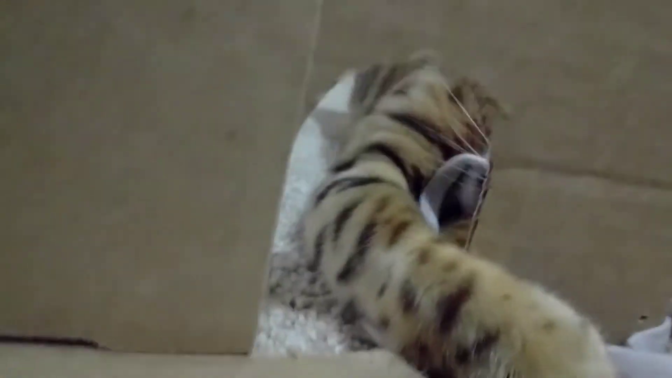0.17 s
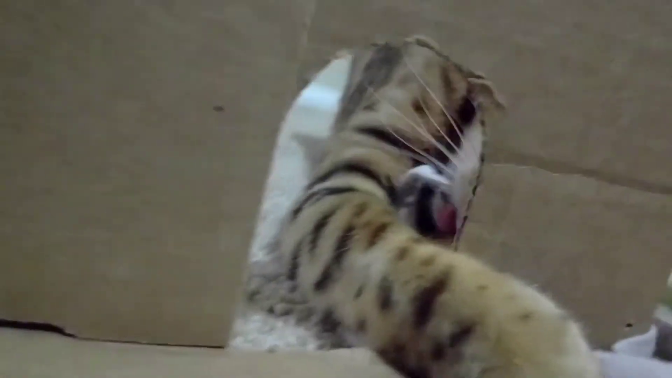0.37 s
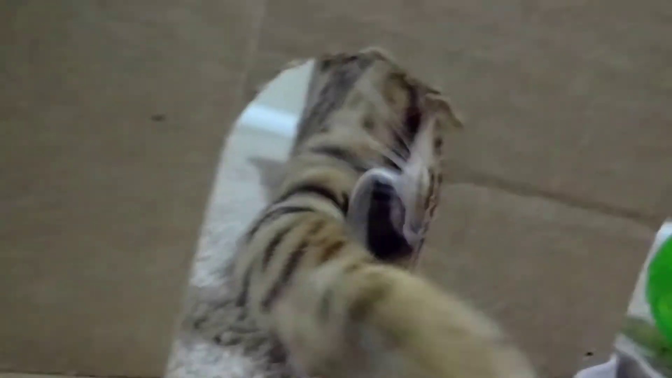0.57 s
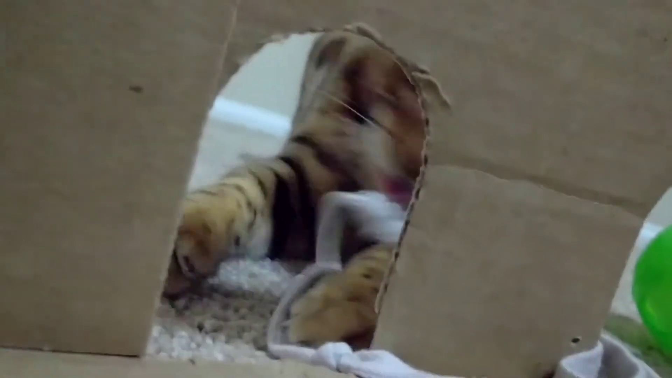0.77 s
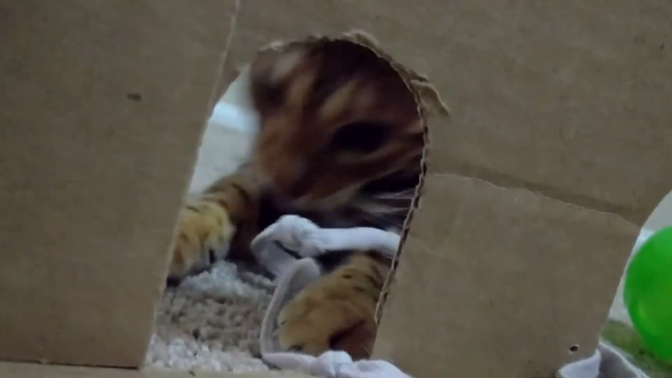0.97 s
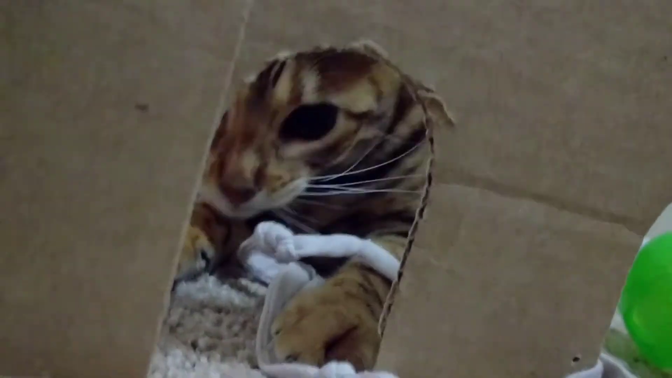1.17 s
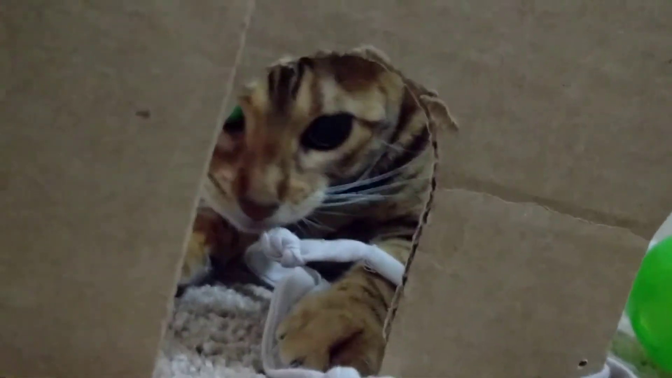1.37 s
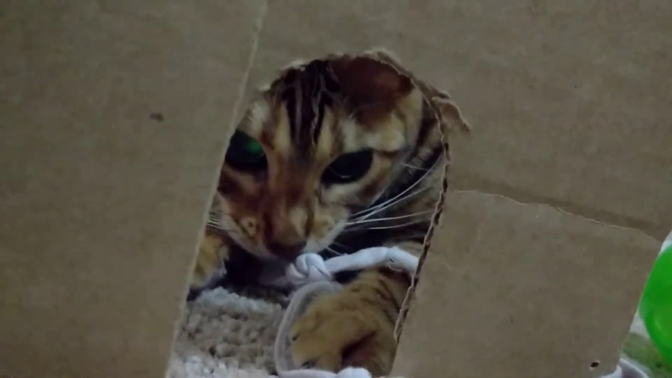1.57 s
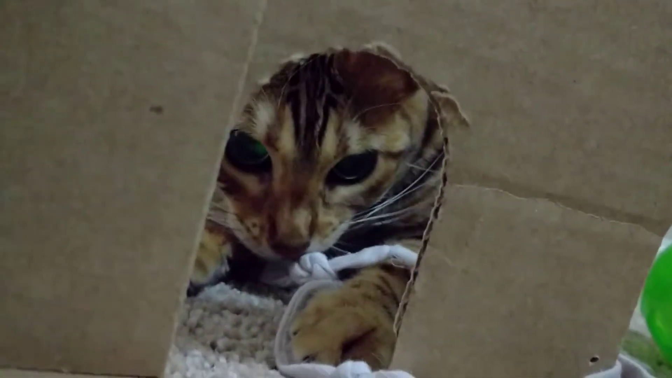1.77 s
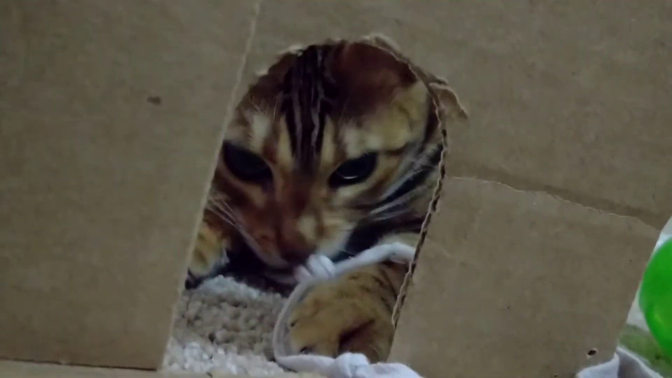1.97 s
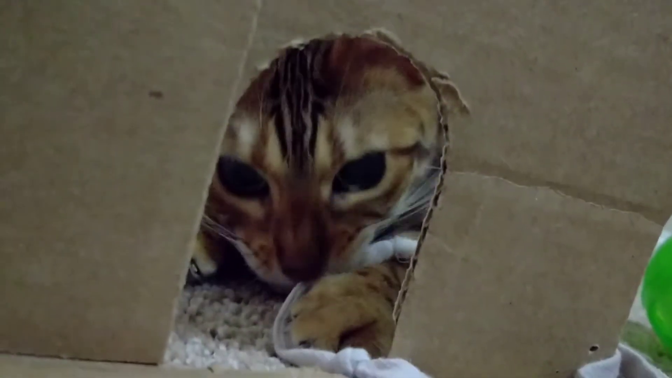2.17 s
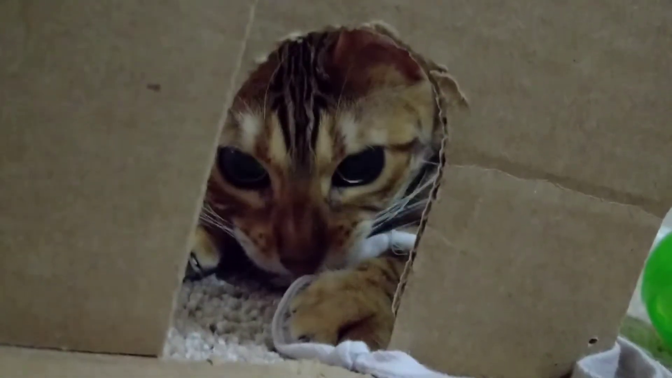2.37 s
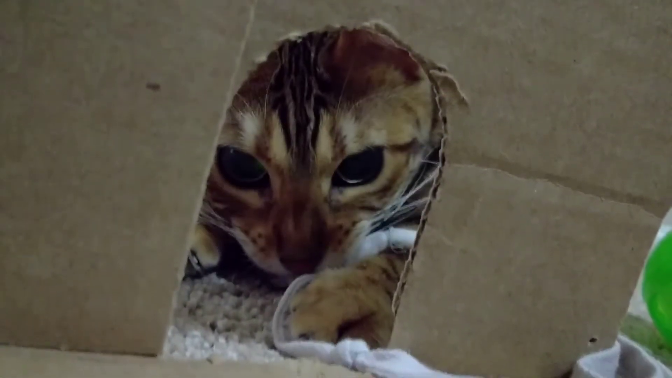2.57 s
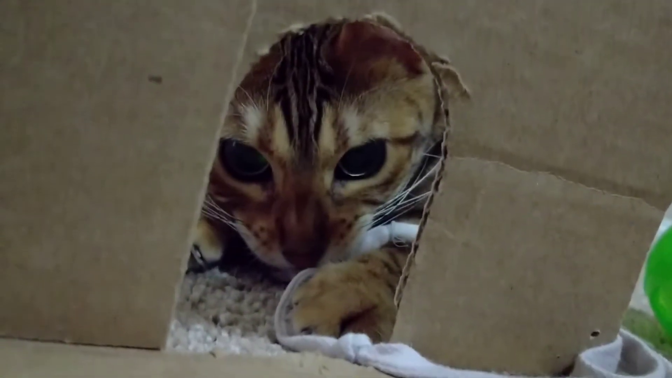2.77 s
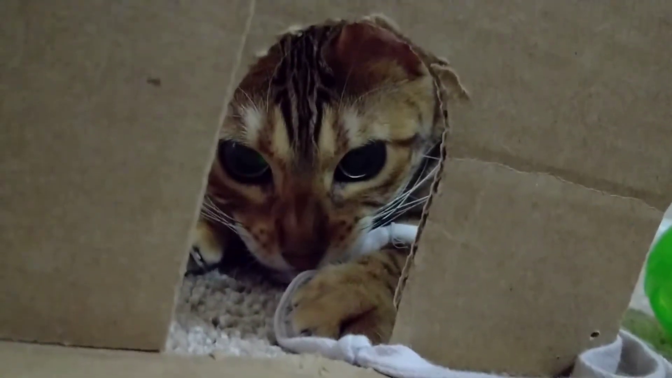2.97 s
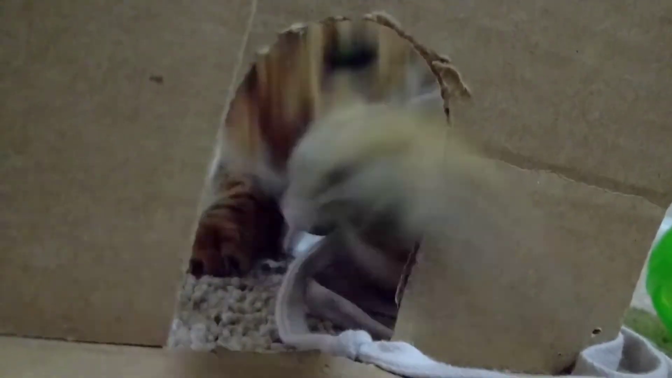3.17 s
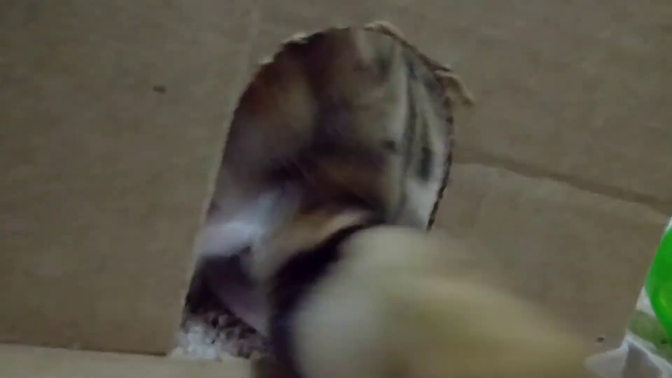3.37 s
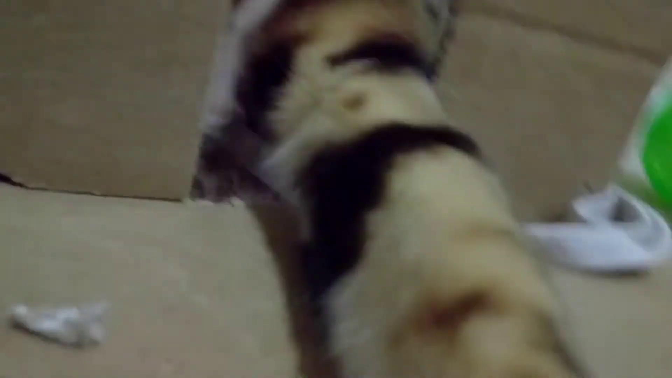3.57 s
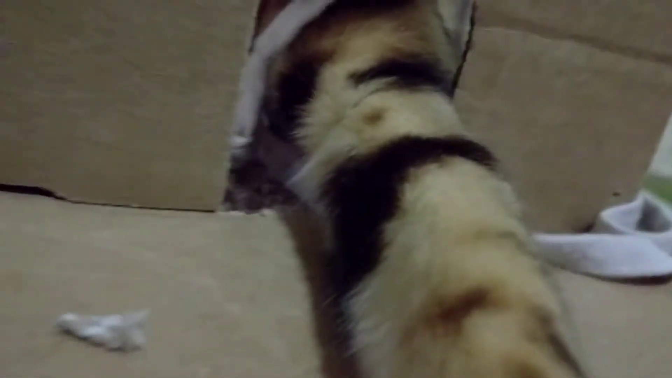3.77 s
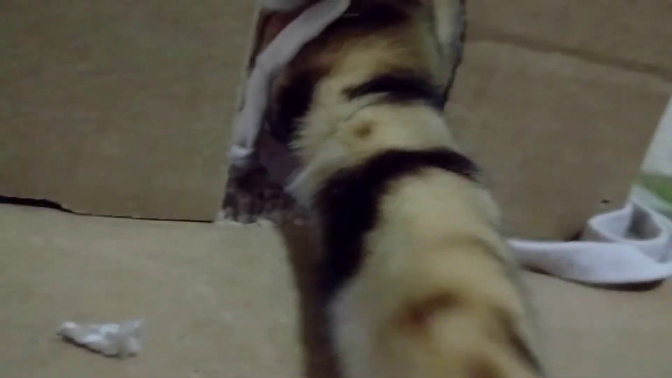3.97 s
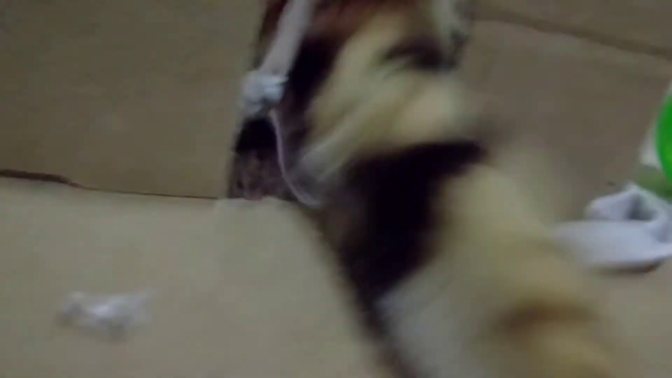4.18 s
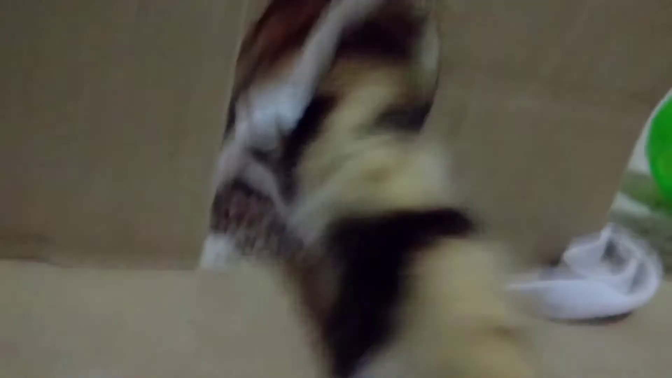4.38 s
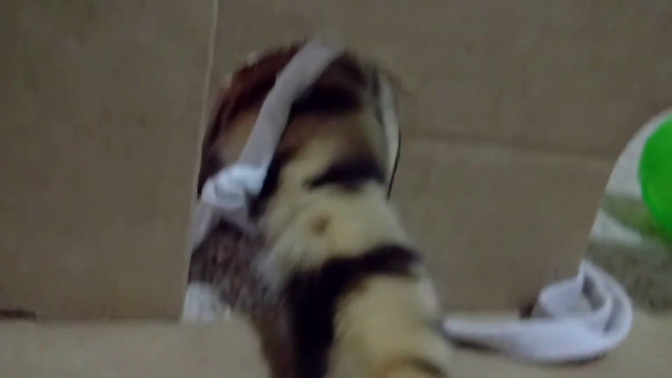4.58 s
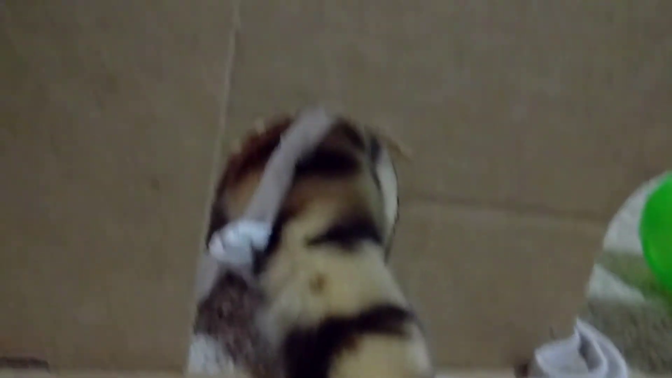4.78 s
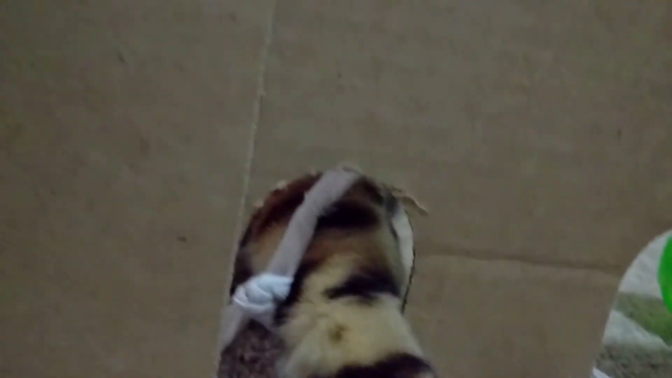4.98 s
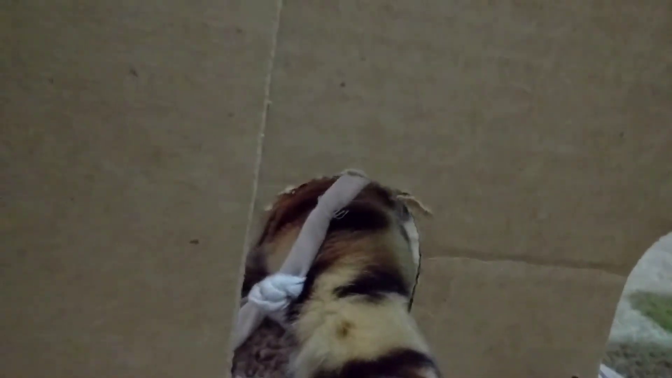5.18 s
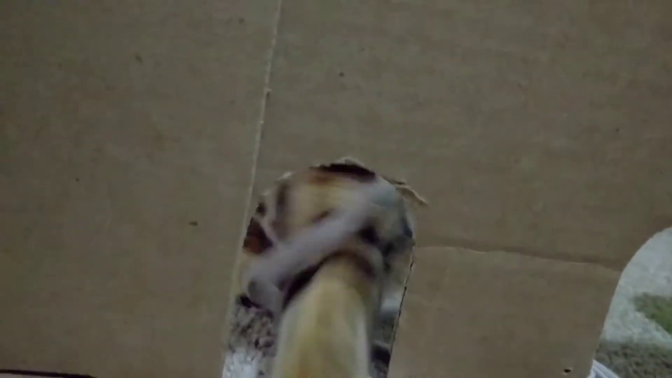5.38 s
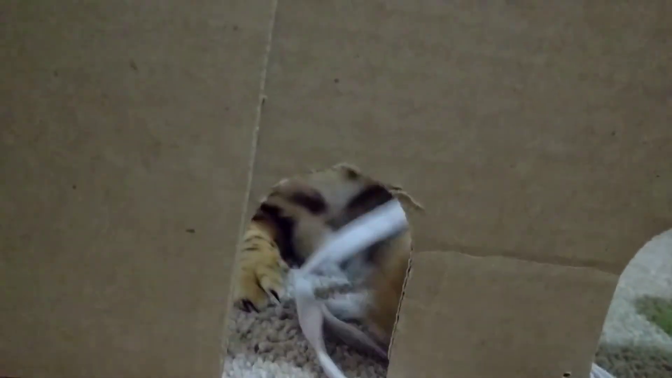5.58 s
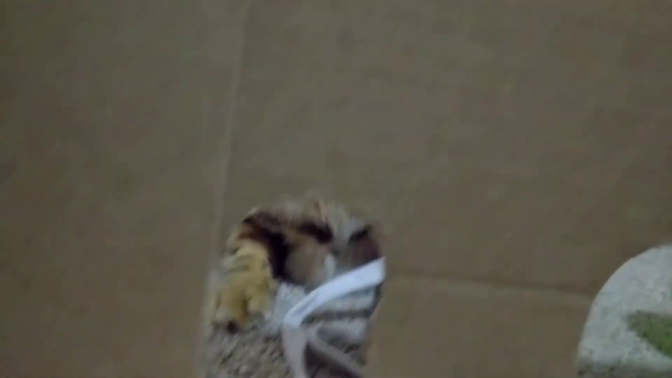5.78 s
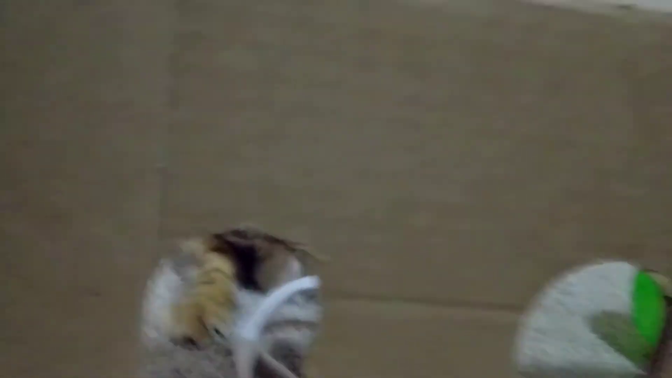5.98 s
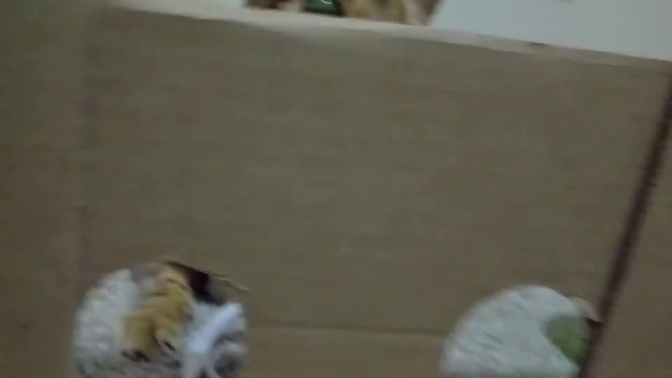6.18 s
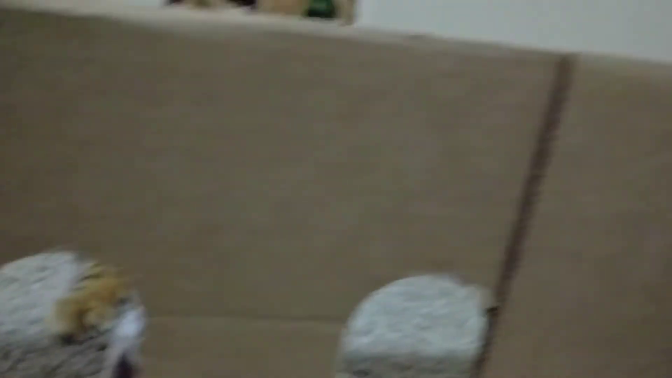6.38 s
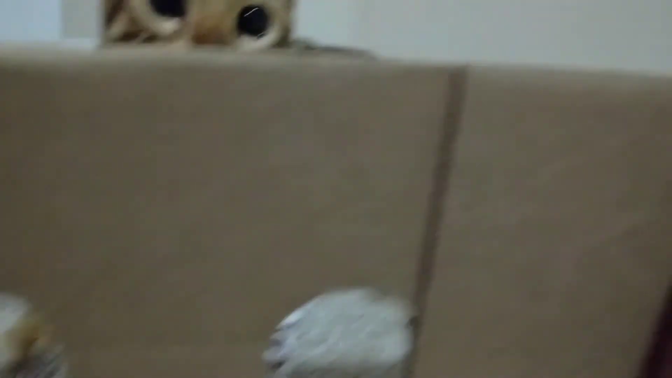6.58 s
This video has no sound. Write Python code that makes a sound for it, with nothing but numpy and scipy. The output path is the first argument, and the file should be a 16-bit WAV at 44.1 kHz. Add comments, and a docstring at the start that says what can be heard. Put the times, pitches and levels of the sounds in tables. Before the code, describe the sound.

A cat's paw rubs and scrapes cardboard, pauses with faint ticks, then slams the microphone with distorted thumps and claw cracks before softer rustling.

```python
"""A cat reaches through a hole in a cardboard box, a hand's width from a small camera inside it.
Throughout, room rumble and hiss lie under fur and cloth rubbing the card: granular friction rings its resonances.
From the start claws scrape and knocks ring card modes; then low swings jolt the camera and claw tips snap free.
Two far, high chirps decay as narrow-band echoes; the hardest blows, midway, saturate the microphone."""
import sys
import numpy as np
from scipy import signal
from scipy.fft import rfft, irfft
from scipy.io import wavfile
from scipy.ndimage import uniform_filter1d, map_coordinates

SR = 44100
rng = np.random.default_rng(int(sys.argv[2]) if len(sys.argv) > 2 else 0)


def generate_wav(signal):
    """Clip the signal to [-1, 1] and save it as 16-bit WAV at the path in sys.argv[1]."""
    frames = np.transpose(np.atleast_2d(signal))
    scaled = np.clip(frames, -1, 1) * 32767
    pcm = np.round(scaled).astype(np.int16)
    wavfile.write(sys.argv[1], SR, pcm)


N = 292824


def undb(db):
    """Amplitude ratio of a level in dB."""
    return 10 ** (np.asarray(db) / 20)


def level(x, db):
    """Scale a signal to an RMS level in dB re full scale."""
    return x * undb(db) / np.sqrt(np.mean(x ** 2))


def resonate(x, hz, width):
    """Second-order resonance: a band-pass of gain 1 at its centre."""
    return signal.lfilter(*signal.iirpeak(hz, hz / width, fs=SR), x)


def body(x, modes):
    """Modal superposition: the sum of steep resonances, each driven by its own row of x."""
    total = 0
    for row, (hz, width, db) in zip(x, modes):
        total = total + undb(db) * resonate(resonate(row, hz, width), hz, 3 * width)
    return total


def add(track, s, piece):
    """Linear superposition: lay a piece into a track from time s, cut at both ends of the track."""
    i = int(s * SR)
    piece = piece[..., max(-i, 0):N - i]
    start = max(i, 0)
    track[..., start:start + piece.shape[-1]] += piece


def walk(rate):
    """Band-limited random modulation: levels held 1 / rate s and slewed twice; spread near 1."""
    k = int(SR / rate)
    steps = np.repeat(rng.standard_normal(N // k + 1), k)
    return 1.3 * uniform_filter1d(uniform_filter1d(steps, k), k)[:N]


def swell(rise, fall):
    """Stroke envelope: a Gaussian build-up over 3 rise times, then a near-exponential decay."""
    u = np.arange(-3 * rise, 4 * fall, 1 / SR)
    return np.where(u < 0, np.exp(-(u / rise) ** 2), np.exp(-np.abs(u / fall) ** 1.1))


def swing(hz, t60):
    """Damped oscillation: a sudden drop in pressure that swings back and dies."""
    u = np.arange(0, .3, 1 / SR)
    decay = np.exp(-np.log(1000) * u / t60)
    onset = 1 - np.exp(-u / .0003)
    return -np.cos(2 * np.pi * hz * u) * decay * onset


def room():
    """Stationary noise: steady rumble and hiss shaped by a power spectrum."""
    # background spectrum: (frequency [Hz], relative density [dB])
    spectrum = [(28, -49.5), (42, -13), (75, -6.5), (103, -18.5), (148, -0.5), (325, -14.5), (411, -16.5),
                (855, -29), (1230, -30), (2430, -29), (7900, -35.5), (12300, -29.5)]
    room_db = -59.5  # RMS
    hz, db = np.transpose(spectrum)
    f = np.maximum(np.arange(N // 2 + 1) * SR / N, 1)
    gain = undb(np.interp(np.log(f), np.log(hz), db))
    return level(irfft(rfft(rng.standard_normal(N)) * gain, N), room_db)


def grit():
    """Stick-slip friction: slip sizes follow quick uneven grains on a slower stutter of the paw."""
    size_db = 2.2 * walk(1500) + .4 * walk(250) + .3 * walk(50)
    return level(undb(size_db), 0)


def effort():
    """Incoherent sources add in power: force on hiss, rasp, drone and rumble from shuffle, rubs and scrapes."""
    # fur and cloth resting and shifting on the card:
    # (time [s], hiss level [dB], rasp [dB re hiss], box drone [dB re hiss])
    shuffle = [(0, -57, 0.5, 1), (.56, -58, -5, -4.5), (.84, -66, -4, 4), (.95, -62.5, -8.5, -4.5),
               (1.4, -70, -9, 3), (2.3, -70, -3, 6), (2.7, -74.5, -25, 6), (3.17, -75.5, 2, 10.5),
               (3.33, -49, -0.5, -6), (3.45, -50, 6, 1.5), (3.639, -52, 5.5, 3.5), (3.79, -55, 0, 4.5),
               (3.92, -53, -5.5, -2), (4.16, -56.5, 0.5, -4.5), (4.66, -58.5, -1, -4.5),
               (5.09, -69.5, -4, 5), (5.28, -60, -0.5, 5.5), (5.63, -64, -3, -1), (6.21, -67.5, -2.5, 4),
               (6.64, -63, -3, -7)]
    # rumble carried through the box: (time [s], level [dB])
    rumble_levels = [(0, -45), (.3, -60.5), (.62, -61.5), (.7, -43), (.8, -55.5), (1.6, -60.5), (1.95, -52),
                     (2.2, -60), (3.25, -60.5), (3.45, -40), (3.64, -36), (3.7, -57), (3.74, -39.5),
                     (3.8, -57), (4.25, -51), (4.3, -25.5), (4.33, -45), (4.4, -36), (4.61, -37),
                     (4.68, -50.5), (5.1, -59.5), (5.25, -50), (5.56, -50.5), (5.65, -60), (6.64, -59.5)]
    # the foreleg slides along the card: (full from [s], held [s], hiss level [dB], change while held [dB],
    # rasp [dB re hiss], box drone [dB re hiss])
    rubs = [(0.082, 0.065, -36, -5.5, -5, -9), (0.238, 0.021, -42, -1, -9, -9.5),
            (0.301, .16, -55.5, 2, -7.5, -16), (0.676, 0.08, -37, -6, -8, -8),
            (1.03, 0.28, -60.5, 0.5, -4, -1.5), (1.54, 0.14, -66.5, 0, -4, -5),
            (2.43, 0.063, -67, 0, -2.5, -9), (4.236, 0.012, -42.5, 2, -3, -7.5),
            (4.31, 0.094, -41.5, -4, -1.5, 0), (4.42, 0.3, -51.5, 0, 0, 4), (4.7, 0.16, -67, 3, -2, 3.5),
            (5.19, 0.0093, -64, -0.5, -15, -13.5), (5.346, 0.071, -40.5, -2.5, -2.5, -8.5),
            (5.456, 0.09, -36, -2, -10, -20.5), (5.559, 0.022, -55.5, 0, 3.5, -1),
            (5.683, 0.33, -58.5, 0.5, -5.5, -8), (5.96, 0.13, -57.5, 5.5, -9, -11),
            (6.115, 0.057, -53.5, -10, -5.5, -10), (6.31, 0.087, -66.5, 1, -7.5, -7),
            (6.59, 0.056, -62, -2, -10, -7)]
    rub_rise_s, rub_fall_s = 0.034, .013
    # short scrapes of paw and claw:
    # (top [s], rise [s], fall [s], rasp level [dB], hiss [dB re rasp], box drone [dB re rasp])
    scrapes = [(0.03, 0.0007, 0.0097, -43, -8, 4.5), (0.045, .002, .005, -49, -14, 6),
               (2.442, 0.0012, 0.0036, -58.5, 15.5, -8), (3.212, 0.00077, 0.011, -49, -25, 14),
               (3.3, .02, .01, -47.5, 3, -6.5), (3.311, .0015, .008, -36, 3.5, -1),
               (3.319, 0.006, 0.022, -35.5, 2, 2.5), (3.3507, 0.00084, 0.0025, -4, -8, -24),
               (3.364, 0.0047, 0.0095, -20.5, -13, -10), (3.371, .003, .004, -30, -10, -9.5),
               (3.375, 0.0009, 0.0016, -28.5, 1, -4), (3.417, 0.00088, 0.003, -29, 2.5, -3.5),
               (3.423, 0.00057, 0.003, -29, -5, -9), (3.446, 0.0097, 0.0057, -26, -1.5, -13.5),
               (3.493, 0.0015, 0.035, -30, -3, -13.5), (3.5567, 0.00074, 0.00062, -4, -3.5, -8.5),
               (3.565, 0.0034, 0.00086, -23.5, 1, -10), (3.57, 0.004, 0.004, -25, 4.5, -13.5),
               (3.58, 0.0007, 0.0044, -21, -8, -8), (3.593, .002, .002, -38, 12, -1),
               (3.608, 0.001, 0.0067, -37, 3, 8), (3.671, 0.0047, 0.008, -44.5, -0.5, 9.5),
               (3.733, 0.0092, 0.0057, -33.5, 6.5, 1), (4.12, 0.026, 0.016, -38.5, 3.5, -5),
               (4.132, 0.0049, 0.004, -36.5, 8.5, -26), (4.225, 0.046, 0.021, -44, 7, -10),
               (4.2851, 0.00071, 0.0065, -24, -1.5, -17.5), (4.29, 0.00082, 0.0044, -25, 1.5, -5),
               (4.303, 0.0094, 0.0033, -31, -4, -4), (4.3197, 0.0005, 0.0027, -30, 2, 6),
               (4.4727, 0.00046, 0.0062, -18.5, -1, -4), (4.482, 0.0019, .004, -18.5, -2.5, -10),
               (4.489, 0.0056, 0.009, -21, -1.5, -11.5), (4.513, 0.013, 0.0073, -37, 5, -3),
               (4.535, .012, 0.045, -45, 1.5, -5), (4.576, .002, 0.034, -45, -1, 2),
               (4.603, 0.00069, 0.0024, -31.5, 0, -3), (5.19, 0.0067, .006, -67, 14.5, -10),
               (5.33, .006, .006, -53, 9, -9), (5.438, 0.0015, 0.01, -35.5, -14, -2.5),
               (5.458, 0.012, 0.012, -35.5, 0.5, -13)]

    t = np.arange(N) / SR
    s, hiss_db, rasp, drone = np.transpose(shuffle)
    levels = [np.interp(t, s, db) + 0.64 * walk(8) for db in (hiss_db, hiss_db + rasp, hiss_db + drone)]
    levels.append(np.interp(t, *np.transpose(rumble_levels)) + 3.3 * walk(22))
    power = undb(levels) ** 2

    edges, top_at = swell(rub_rise_s, rub_fall_s), int(3 * rub_rise_s * SR)
    for start, held, db, change_db, rasp, drone in rubs:
        hold = undb(np.linspace(0, change_db, int(abs(held) * SR) + 1))
        shape = np.concatenate([edges[:top_at], hold, hold[-1] * edges[top_at:]])
        strokes = np.outer(undb([db, db + rasp, db + drone]), shape)
        add(power[:3], start - 3 * rub_rise_s, strokes ** 2)

    for top, rise, fall, db, hiss, drone in scrapes:
        strokes = np.outer(undb([db + hiss, db, db + drone]), swell(rise, fall))
        add(power[:3], top - 3 * rise, strokes ** 2)
    return np.sqrt(power)


def rubbing(grain):
    """Friction-driven resonance: dense slips, shaped by the force, ring the fibres and the card."""
    # resonances behind the drone, rasp and hiss, each driven through two resonators in series:
    # (centre [Hz], width of the narrower resonator [Hz], relative gain [dB])
    panel = [(270, 74, 4.5), (453, 103, -2.5), (530, 330, -2.5), (775, 110, -8)]
    skin = [(1064, 300, -8), (1444, 590, 25), (2060, 700, 16), (2300, 290, 5.5), (2880, 2600, 19),
            (3870, 1600, 16), (4350, 2700, -12.5)]
    fibres = [(5700, 4700, -6), (6970, 2600, -2.5), (8300, 1300, -5), (9730, 2600, 1.5),
              (13300, 3400, -5.5), (15000, 2100, -2.5)]
    hiss, rasp, drone, rumble = effort()
    out = 0
    for force, modes in ((hiss, fibres), (rasp, skin), (drone, panel)):
        patchy = undb([1.7 * walk(25) for _ in modes])
        slips = grain * patchy * rng.standard_normal((len(modes), N))
        # unit RMS under steady force, so that the force alone sets the level
        out = out + body(slips * force, modes) / np.std(body(slips, modes))
    shake = resonate(resonate(rng.standard_normal(N), 62., 60.), 70., 120.)
    return out + rumble * level(shake, 0)


def walls(x):
    """Comb filtering: two short, randomly drifting echoes from the box interfere with the direct sound."""
    # echoes from the near and far walls: (lag [ms], share before the factor below, drift of the lag [ms])
    echoes = [(0.409, 0.11, 0.014), (1.081, 0.07, 0.015)]
    # strength of the echoes as the foreleg moves in the box: (time [s], factor on the shares)
    clearance = [(0, 0.56), (3.2, 1.2), (3.7, 0.74), (4.8, 0.79), (5.55, 0.74), (5.75, 0.91), (6.15, 0.97),
                 (6.3, .9)]
    clear = np.interp(np.arange(N) / SR, *np.transpose(clearance))
    late = 0
    for ms, share, drift in echoes:
        read_at = np.arange(N) - (ms + drift * walk(3)) * SR / 1000
        late = late + share * map_coordinates(x, [read_at], order=3)
    echo_power = clear ** 2 * sum(share ** 2 for _, share, _ in echoes)
    return (x + clear * late) / np.sqrt(1 + echo_power)


def rasps():
    """Local resonance: a claw drags and one patch of card sings in a band of noise."""
    # (top [s], rise [s], fall [s], RMS level at the top [dB], centre [Hz])
    drags = [(.055, .012, 0.011, -47, 2200), (.085, 0.045, 0.038, -48, 1600), (.1, 0.038, .04, -49.5, 2290),
             (.1, 0.041, 0.035, -49.5, 710), (.174, 0.024, 0.0039, -46.5, 2080),
             (.66, .008, 0.012, -45, 600), (.695, 0.017, 0.012, -41, 5500), (.695, .02, .015, -44, 10200),
             (.715, .03, .012, -40, 8100), (.745, 0.017, .005, -40, 6400), (.75, 0.017, .008, -44.5, 8900),
             (.75, 0.014, 0.0092, -45.5, 1870), (1.3, 0.23, 0.21, -58.5, 252), (1.95, 0.14, .1, -58, 170),
             (3.314, 0.0077, 0.013, -31, 4180), (3.335, .012, .01, -38, 3600),
             (3.363, .006, 0.011, -34, 3600), (3.418, 0.0023, 0.003, -26, 2410),
             (3.424, .001, 0.0021, -37, 5300), (3.441, .006, .006, -26.5, 2190),
             (3.449, 0.0085, 0.0048, -27, 3846), (3.734, 0.011, 0.0047, -30, 7760),
             (3.849, 0.19, 0.14, -63, 1390), (4.36, .03, 0.0088, -44.5, 7800),
             (4.55, 0.041, 0.026, -45, 590), (4.585, .004, 0.006, -46, 3330),
             (4.586, 0.004, 0.005, -46, 5780), (3.39, .006, 0.011, -36, 2100),
             (3.385, .004, .008, -42, 3300), (4.05, .1, 0.11, -69, 1440),
             (4.133, 0.0038, 0.0033, -37.5, 2580), (4.7, .1, 0.13, -61, 1432),
             (4.95, 0.1, 0.12, -69.5, 1470), (5.2, 0.13, .08, -67.5, 1460), (4.78, .06, .04, -61, 8100),
             (5.345, .01, .01, -48, 1534), (5.355, 0.019, 0.014, -45, 3100),
             (5.36, 0.016, .015, -42.5, 2300), (5.39, .005, .008, -41, 2400),
             (5.418, 0.016, 0.0093, -43, 2500), (5.465, .012, .005, -36.5, 5120),
             (5.541, .004, .003, -41, 8300), (5.51, .03, .02, -42.5, 4640),
             (5.456, 0.013, 0.013, -37.5, 2580), (5.461, 0.013, 0.022, -38, 6700),
             (5.495, .018, .02, -43, 2700), (5.545, 0.014, 0.022, -44.5, 2250),
             (5.55, 0.022, 0.011, -42, 3640), (5.7, .05, .05, -63, 3320), (5.79, 0.05, .01, -59, 3500),
             (5.7, .04, 0.045, -64, 4100), (5.86, 0.15, 0.092, -66, 5500), (5.84, 0.053, 0.022, -63, 4480),
             (6.08, 0.062, 0.039, -59, 3090), (6.0, .04, 0.029, -66, 2650),
             (6.079, 0.014, 0.011, -60, 7000), (6.06, .08, 0.048, -59.5, 4100),
             (6.175, 0.074, 0.0075, -62.5, 4300), (6.06, 0.065, 0.048, -59.5, 5530),
             (6.175, 0.066, 0.0086, -62, 5200), (6.364, 0.028, 0.022, -65, 6900),
             (6.491, 0.003, .005, -53, 3910)]
    # harder drags sing wider: (level [dB], width of each of two resonators [share of the centre])
    widths = [(-62, .12), (-30, 0.29)]
    out = np.zeros(N)
    for (top, rise, fall, db, hz), noise in zip(drags, rng.standard_normal((len(drags), 2 * SR))):
        shape = swell(rise, fall)[:SR + SR // 2]
        width = hz * np.interp(db, *np.transpose(widths))
        band = level(resonate(resonate(noise, hz, width), hz, width), db)
        # the end of the noise, where the resonators have settled
        add(out, top - 3 * rise, band[-len(shape):] * shape)
    return out


def knocks():
    """Modal impact: pad or claw rings the modes of the card near the pitch that the contact favours."""
    # (time [s], level of a mode at the favoured pitch [dB], favoured pitch [Hz]: low for pad, high for claw)
    hits = [(.031, -35.5, 1400), (.033, -46, 280), (.044, -36, 1400), (3.212, -36.5, 268),
            (3.3506, 2.5, 1850), (3.3755, -23, 303), (3.5134, -2, 1110), (3.5231, 24, 885),
            (3.563, -7, 1010), (3.5655, -12, 1400), (3.58, -21, 1770), (3.607, -24, 1440),
            (3.6075, -32, 2400), (3.614, -36, 1700), (3.417, -23, 2500), (3.423, -27, 2490),
            (3.424, -31.5, 500), (3.495, -32, 300), (3.734, -28, 260), (3.737, -31, 438),
            (4.116, -32.5, 510), (4.12, -29.5, 1400), (4.286, -11.5, 240), (4.2865, -10, 940),
            (4.2888, -8.5, 1400), (4.319, -25, 2200), (4.371, -27, 630), (4.4723, -15, 233),
            (4.4728, -18, 1380), (4.486, -35, 795), (4.508, -34, 245), (4.545, -41, 560), (4.565, -42, 700),
            (4.575, -31.5, 3420), (4.5752, -32, 5750), (4.67, -42, 770), (4.728, -44, 610),
            (4.75, -54, 480), (4.798, -45, 600), (4.822, -56, 590), (5.369, -35.5, 557),
            (5.439, -34.5, 880), (5.442, -40, 510), (5.4385, -42, 1400), (5.444, -32, 900),
            (5.447, -38, 1700), (5.462, -37.5, 600), (5.565, -41, 1800), (5.57, -43, 800),
            (5.585, -49, 650), (5.7735, -36.5, 475), (5.79, -44.5, 580)]
    # modes of the card when knocked softly: (frequency [Hz], t60 [s])
    card = [(245, 0.087), (280, 0.028), (392, .03), (440, 0.023), (505, 0.055), (600, 0.03), (775, 0.016),
            (880, 0.012), (1400, .035), (1815, .04), (2500, .018), (3450, 0.026), (5750, .035)]
    contact_db_per_oct2 = -61  # modes away from the favoured pitch are weaker
    press_from_db, press_shortens = -23, 0.41  # harder knocks press: dB of ring time lost per dB of level
    out = np.zeros(N)
    for s, db, favoured_hz in hits:
        shorter = undb(-press_shortens * max(db - press_from_db, 0))
        for hz, t60 in card:
            mode_db = db + contact_db_per_oct2 * np.log2(hz / favoured_hz) ** 2
            add(out, s, undb(mode_db) * swing(hz, t60 * shorter))
    return out


def jolts():
    """Damped mass on a spring: each jolt from the paw swings the camera at one low pitch."""
    # (time [s], level before the onset softens it [dB], swing [Hz], t60 [s])
    blows = [(0.658, -52, 70, .13), (1.966, -47, 90, .17), (3.305, -24.5, 89.8, 0.38),
             (3.352, 2, 290, 0.021), (3.355, -9.5, 114, 0.035), (3.384, -25, 66, 0.3),
             (3.5237, 8, 74.6, 0.042), (3.5312, 1, 52, 0.027), (3.5409, 3, 95, 0.019),
             (3.555, -12.5, 54, 0.21), (3.5825, -10.5, 300, 0.02), (3.585, -9, 125, 0.031),
             (4.287, -19.5, 151, 0.056), (4.386, -26, 66.6, 0.38), (4.542, -29, 58, 0.47),
             (4.599, -26.5, 68.4, 0.15), (6.107, -40, 90, 0.052)]
    out = np.zeros(N)
    for s, db, hz, t60 in blows:
        add(out, s, undb(db) * swing(hz, t60))
    return out


def snaps():
    """Impulsive release: a claw tip snaps free; faint snaps ring one band, loud ones add a broadband push of air."""
    # (time [s], peak level [dB], centre [Hz])
    releases = [(1.24, -42, 9000), (1.3226, -42, 10200), (1.5125, -46, 10100), (1.808, -41, 10500),
                (1.937, -47, 10000), (2.0862, -42.5, 7760), (2.2268, -45, 11000), (2.293, -41, 11500),
                (2.474, -46, 5360), (2.649, -54, 10500), (2.858, -44, 11000), (3.0669, -42.5, 10500),
                (3.166, -45, 9890), (3.2097, -39, 2940), (3.35, -6.5, 4060), (3.5138, -6, 3064),
                (3.518, 4.5, 3110), (3.5211, 2, 6100), (3.525, 0.5, 4000), (3.5309, 7.5, 5980),
                (3.5321, 1, 6550), (3.541, 4.5, 4714), (3.5536, -3, 3380), (3.563, -9.5, 5970),
                (3.5653, -10, 6500), (3.58, -7.5, 2780), (3.5947, -8, 6600), (3.922, -30.5, 10900),
                (4.284, -13.5, 3940), (4.2892, -3, 7660), (4.47, -19, 4950), (4.6035, -18.5, 6150),
                (4.958, -42.5, 9800), (5.168, -44, 9740), (6.0071, -35, 7500), (6.115, -38, 7000),
                (6.4277, -41.5, 10500), (6.535, -51, 10000)]
    out, u = np.zeros(N), np.arange(0, .006, 1 / SR)
    for (s, db, hz), noise in zip(releases, rng.standard_normal((len(releases), len(u)))):
        burst = noise * np.exp(-u / .0004)
        ring = resonate(resonate(burst, hz, 1.0 * hz), hz, 1.0 * hz)
        push = np.interp(db, [-14, -4], [0, 1.8]) * np.exp(-((u - .0002) / .00007) ** 2)
        broad_share = np.interp(db, [-40, -10], [0, .6])
        snap = ring + broad_share * (burst + push)
        add(out, s, undb(db) * snap / np.abs(snap).max())
    return out


def chirps():
    """Reverberant decay: a thin high note starts at once and flutters as its narrow-band echoes fade."""
    # far chirps that ring on in another room: (time [s], initial echo level [dB], pitch [Hz], t60 [s])
    calls = [(2.62, -66, 5300, 0.34), (6.426, -58.5, 5250, 0.54)]
    out, u = np.zeros(N), np.arange(0, .5, 1 / SR)
    for (s, db, hz, t60), noise in zip(calls, rng.standard_normal((len(calls), len(u)))):
        echoes = level(resonate(resonate(noise, hz, 200.), hz, 200.), 0)
        note = 0.56 * np.sin(2 * np.pi * hz * u) * np.exp(-u / .03)
        decay = np.exp(-np.log(1000) * u / t60)
        add(out, s, undb(db) * (note + echoes * decay))
    return out


def scene():
    """Superposition of all sources; rubs and rasps share one slip grain, and the rubs alone pass the walls."""
    grain = grit()
    friction = walls(rubbing(grain)) + grain * rasps()
    return (friction + snaps() + jolts() + knocks() + chirps() + room())[None]


def record(dry):
    """Saturation: the microphone drops deep bass and flattens the hardest blows; the sound is then band-limited."""
    overload, top_hz = .7, 15750  # ceiling [full scale], upper band edge [Hz]
    dry = signal.sosfilt(signal.butter(4, 35, "high", fs=SR, output="sos"), dry)
    flat = dry / (1 + np.abs(dry / overload) ** 6) ** (1 / 6)
    return signal.sosfilt(signal.ellip(12, .2, 90, top_hz, fs=SR, output="sos"), flat)


dry = scene()
out = record(dry)
generate_wav(out)
```